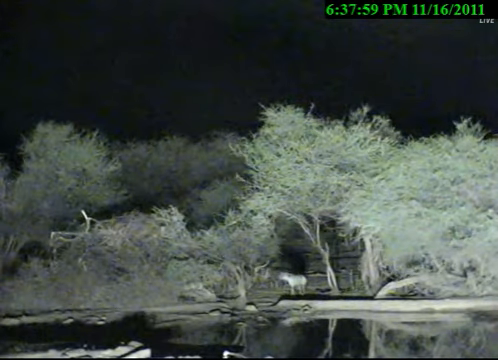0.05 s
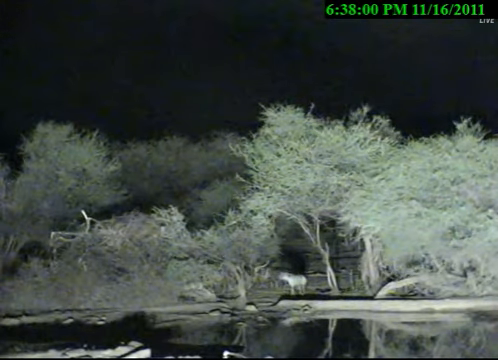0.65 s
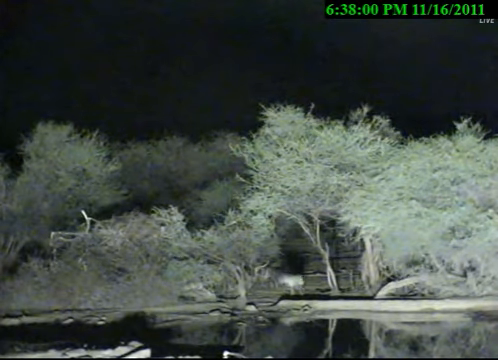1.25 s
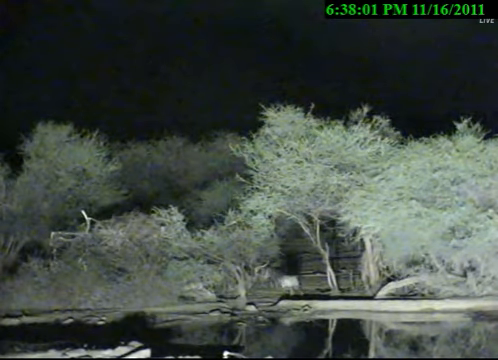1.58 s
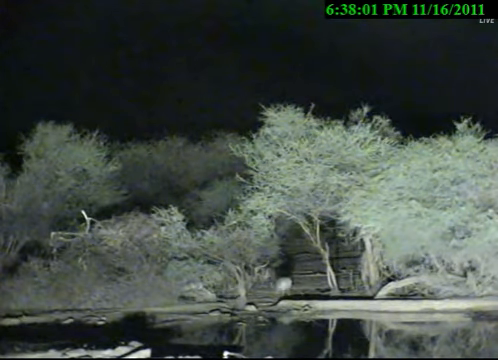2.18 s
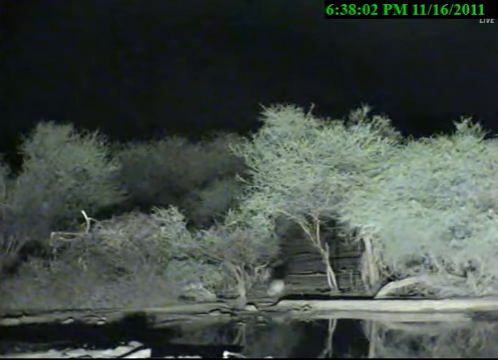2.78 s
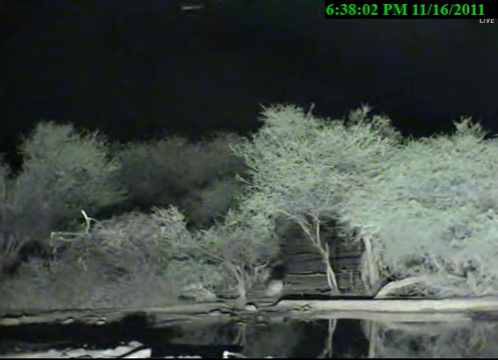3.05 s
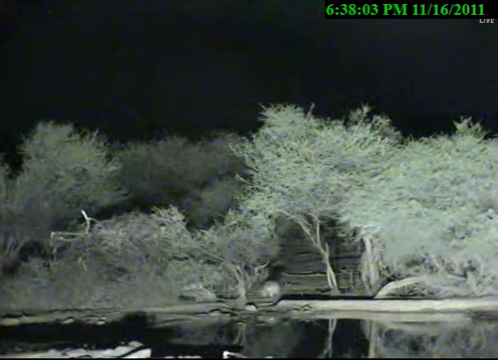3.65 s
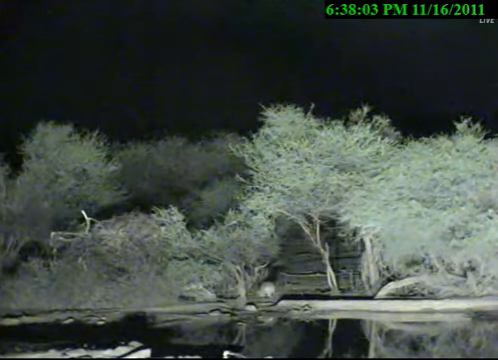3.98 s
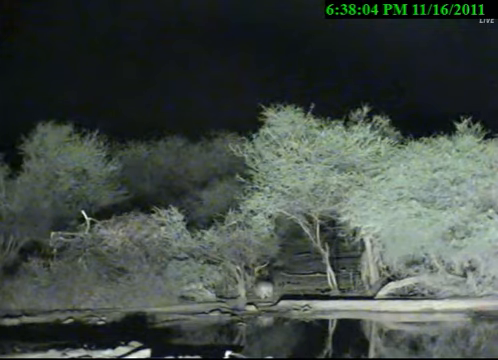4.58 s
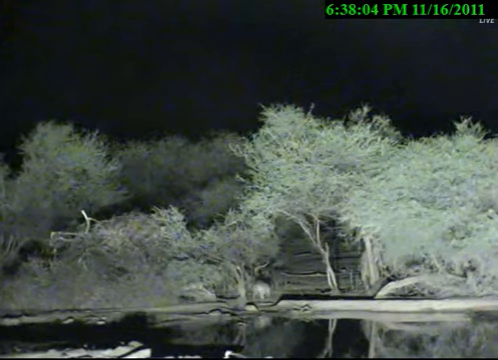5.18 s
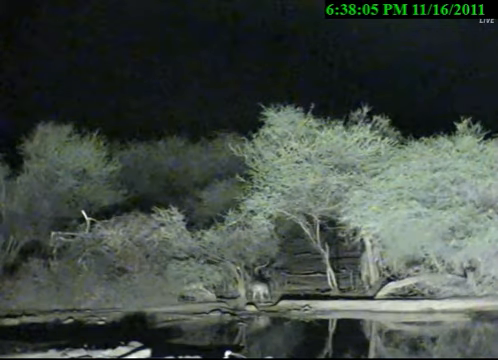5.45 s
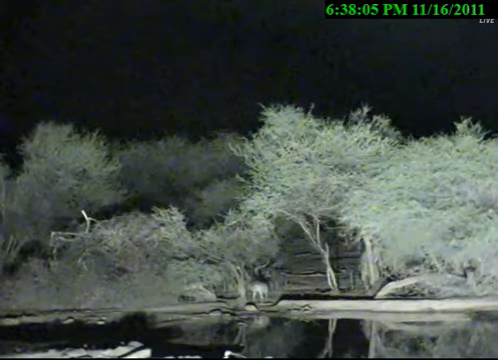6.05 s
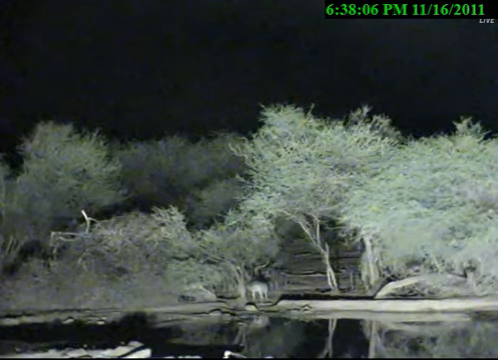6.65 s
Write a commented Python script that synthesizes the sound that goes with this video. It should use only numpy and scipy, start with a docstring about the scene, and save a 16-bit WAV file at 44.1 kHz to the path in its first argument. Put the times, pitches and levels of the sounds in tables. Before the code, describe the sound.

At a waterhole at night, a frog gives short, nasal, raspy croaks about every half second, stopping after five seconds. Small frogs whistle quick runs of high peeps throughout, over a rattling katydid and shrill insect trills. A sharp water plop comes early, and near the end a far animal whoops once, followed by a softer plop. The outdoor microphone also catches a murmuring distant frog chorus and a faint hum.

```python
"""A frog croaks at a waterhole at night: its buzzing larynx drives a resonant vocal sac in short nasal
calls. Small frogs whistle peeps in runs that swell and slow down. By stridulation, a scraper drawn over
a file, a katydid rattles in even phrases and two shriller insects trill in turns. Air pockets plop in
the water and a far animal whoops once. The bush scatters echoes, a far chorus murmurs across the pond,
and the outdoor microphone carries a faint mains hum."""
import sys
import numpy as np
from scipy import signal
from scipy.fft import rfft, irfft, next_fast_len
from scipy.io import wavfile
from scipy.ndimage import uniform_filter1d

SR = 44100
rng = np.random.default_rng(int(sys.argv[2]) if len(sys.argv) > 2 else 0)


def unload_audio(sound):
    """Save the sound as a 16-bit wav file, at the path given as the first command line argument."""
    columns = np.transpose(np.atleast_2d(sound))
    # keep every value between -1 and 1, then stretch to whole-number steps
    steps = np.round(np.clip(columns, -1, 1) * 32767)
    wavfile.write(sys.argv[1], SR, steps.astype(np.int16))


N = 305172
TIME = np.arange(N) / SR

# Levels are relative within each table.
# croaks: onset t/s, duration/s, fundamental f/Hz, tone level/dB, rasp level/dB
CROAKS = [(0.196, 0.12, 231.7, -19, -21.5), (0.847, 0.084, 230, -18.5, -21),
          (2.111, 0.085, 232, -22, -19.5), (2.398, 0.093, 237.6, -33.5, -22.5),
          (2.709, 0.083, 222.6, -28, -23.5), (3.07, 0.11, 224.9, -20.5, -21),
          (3.602, 0.1084, 229.5, -17, -19.5), (4.128, 0.11, 233.2, -19, -20.5),
          (4.559, 0.13, 234.7, -20, -19), (5.074, 0.15, 236.9, -18, -19)]
# partials of a croak, strongest at the resonance of the vocal sac: harmonic number, level/dB
CROAK_HARMONICS = [(2, -18), (3, 0.5), (4, -8.5), (5, -14), (6, -28), (7, -19.5), (8, -18.5), (9, -24),
                   (10, -28)]
# spectrum of the breath in a croak: f/Hz, level/dB
RASP_SPECTRUM = [(150, -51), (300, -31), (450, -6.5), (750, -3.5), (1100, -3.5), (1600, -5), (2100, -11),
                 (2600, -16), (3400, -19), (5000, -13), (8000, -61)]
# single loud peeps and one sharp, insect-like tick: peak t/s, level/dB, f/Hz, duration/s
PEEPS_AND_TICK = [(1.017, -17.5, 4750, 0.015), (1.075, -14.5, 4810, 0.02), (1.136, -11.5, 4790, 0.013),
                  (1.207, -12, 4860, 0.017), (3.438, -18.5, 4740, 0.022), (3.518, -14.5, 4760, 0.032),
                  (3.667, -16, 4780, 0.033), (3.747, -15, 4750, 0.034), (4.099, -19, 5660, 0.009),
                  (4.661, -16, 4780, 0.015), (4.719, -13, 4770, 0.015), (4.781, -12, 4890, 0.019),
                  (4.852, -12, 4905, 0.024)]
# runs of the nearest small frog: start t/s, stretch factor of the gaps
PEEP_RUNS = [(-0.264, 1.0), (0.7075, 0.975), (1.6555, 1.005), (2.69, 1.0), (3.713, 0.985), (4.733, 0.995),
             (5.762, 1.0), (6.756, 0.95)]
# katydid bouts: onset t/s, number of phrases, wing strokes in the last phrase
KATYDID_BOUTS = [(0.084, 3, 10), (0.8, 2, 9), (1.251, 2, 10), (1.718, 1, 10), (1.975, 3, 9), (2.655, 1, 9),
                 (2.893, 4, 9), (3.885, 3, 9), (4.565, 6, 10), (5.95, 5, 9)]
# response of the katydid's wing: f/Hz, level/dB
WING_RESPONSE = [(3500, -28), (4400, -11), (4900, 6.5), (5400, 3.5), (5950, 5.5), (6400, -1), (7200, 11.5),
                 (8000, -12), (8700, -5.5), (10000, -32)]
# bouts of the higher and the lower shrill insect: onset t/s, end t/s, rise time/s, level/dB
HIGH_TRILL_BOUTS = [(-0.5, 0.36, 0.45, -30), (0.55, 1.45, 0.56, -31.5), (1.8, 2.53, 0.4, -30.5),
                    (2.8, 3.55, 0.46, -30.5), (3.88, 4.64, 0.41, -30.5), (5.0, 5.8, 0.47, -31.5),
                    (5.9, 6.67, 0.47, -31)]
LOW_TRILL_BOUTS = [(-0.4, 0.68, 0.3, -34), (0.94, 1.92, 0.24, -31), (1.95, 2.9, 0.25, -37.5),
                   (2.92, 3.53, 0.18, -31.5), (3.83, 4.55, 0.35, -31), (4.6, 5.25, 0.18, -39),
                   (5.1, 6.22, 0.7, -28.5), (6.2, 6.7, 0.09, -46)]
# upper wing mode of the shrill insects: f/Hz, level/dB
UPPER_WING_MODE = [(7600, -33), (8250, -0.5), (8800, 3), (9500, -36.5)]
# plops in the water: onset t/s, level/dB, f/Hz, decay time T60/s
PLOPS = [(1.438, -2, 553, 0.014), (2.893, -17.5, 566, 0.066), (6.47, -20, 782, 0.1)]
# contour of the whoop: t/s, f/Hz, level/dB
WHOOP_CONTOUR = [(6.168, 480, -44), (6.21, 529.5, -30.5), (6.25, 598, -27), (6.28, 789, -27),
                 (6.331, 702, -30.5), (6.37, 560, -41)]
# spectrum of the whoop's hoarseness: f/Hz, level/dB
WHOOP_RASP_SPECTRUM = [(250, -25), (700, 7.5), (1400, -14), (2400, -1), (3400, -8), (5000, -34)]
# spectra of the far frogs and the far insects: f/Hz, level/dB
CHORUS_SPECTRUM = [(30, -74.5), (100, -57), (150, -33.5), (220, -21.5), (320, -7.5), (450, -0.5),
                   (680, 3.5), (950, -3.5), (1200, -12.5), (2000, -14.5), (3000, -15.5), (4000, -17.5),
                   (7000, -16.5), (10000, -41.5)]
FAR_INSECT_SPECTRUM = [(3500, -27), (4100, -18.5), (4500, -7.5), (5200, -2), (6000, 0), (6700, 3.5),
                       (7400, -24), (8000, -34.5), (8800, -24), (10000, -38)]
# reverberation of the bush round the pond: f/Hz, decay time T60/s
BUSH_DECAY = [(300, 0.11), (800, 0.29), (2500, 0.16), (5000, 0.13), (9000, 0.013)]
# mains hum and a faint electrical whine: f/Hz, level/dB
HUM_PARTIALS = [(150, -77), (193, -66), (250, -57.5), (300, -57), (350, -52.5), (955, -45)]


def croak(start, length, hz, tone_db, rasp_db, attack_s=0.041, droop=0.082, jitter=0.017, dulling_db=17):
    """Source and filter: the larynx rings the vocal sac; pitch sags and tone dulls as air runs out."""
    u = np.linspace(0, 1, int(length * SR))
    push = np.interp(u, [0, np.clip(attack_s / length, .1, .9), 1], [0, 1, 0])
    arch = 1 + droop * (.2 - 3 * (u - .24) ** 2)
    cycles = np.cumsum(hz * arch * (1 + jitter * wander(len(u), 300))) / SR
    tone = sum(gain_of(db - dulling_db * (u - .45) * (k - 3) / 5)
               * np.cos(2 * np.pi * (k * cycles + rng.random())) for k, db in CROAK_HARMONICS)
    tone = unit_rms(tone * (1 + .2 * wander(len(u), 150)))
    # air breaks through in a puff each cycle, brightest early and under the hardest push
    airflow = 1 + np.exp(-(cycles % 1) / 0.21)
    puffs = colour(airflow * rng.standard_normal(len(u)), RASP_SPECTRUM)
    dull_puffs = signal.lfilter(*signal.butter(1, 700, fs=SR), puffs)
    brightness = push ** 0.28 * (1 - u) ** 1.5
    rasp = unit_rms(puffs * brightness + 1.47 * dull_puffs * (1 - brightness))
    envelope = unit_rms(np.sin(np.pi / 2 * push) ** 1.2)
    return start, envelope * (gain_of(tone_db + 0.5) * tone + gain_of(rasp_db - 5.5) * rasp)


def peep(peak_s, db, hz, length, symmetric_s=.028, quaver_hz=45, octave_db=-30):
    """Frequency glide: a whistle with a faint octave slides down; shorter notes start more abruptly."""
    u = np.linspace(0, 1, int(length * SR))
    skew = (length / symmetric_s) ** .45
    crest = .5 ** (1 / skew)  # fraction of the note at which the envelope peaks
    fall = 0.021 + 5.26 * length
    slide = fall * (u - crest + 1.6 * (u - crest) ** 2 * length / symmetric_s)
    phase = 2 * np.pi * np.cumsum(hz * (1 - slide) + quaver_hz * wander(len(u), 493)) / SR
    envelope = np.sin(np.pi * u ** skew) * (1 + .13 * wander(len(u), 700))
    whistle = np.sin(phase) + gain_of(octave_db) * np.sin(2 * phase)
    return peak_s - length * crest, gain_of(db + 3.5) * envelope * whistle


def peep_run(start, stretch, count=9, warm_db=-19.5, warm_hz=4924, peep_s=.0145):
    """Approach to a steady state: as the frog warms up, its peeps come slower, louder and higher."""
    k = np.arange(count)
    gaps = .0495 - .018 * np.exp(-(k / 3.15) ** 2)
    cold = np.exp(-k / 1.8)
    level_scatter, pitch_scatter, length_scatter = rng.standard_normal((count, 3)).T
    times = start + stretch * (np.cumsum(gaps) - gaps)
    levels = warm_db - 12 * cold + 1.3 * level_scatter
    pitches = warm_hz - 190 * cold + 40 * pitch_scatter
    return zip(times, levels, pitches, peep_s * np.exp(.12 * length_scatter))


def katydid(db=-31.5, uneven_db=1.9, tooth_s=.001603, ring_hz=5600, glide_hz=1300, ring_s=0.003006):
    """Impulse excitation: each stroke plucks five teeth, and each gives a falling ring of the wing."""
    clicks = np.zeros(N)
    teeth = np.array([0.82, -0.59, 1.0, 0.22, 0.66])
    for start in stroke_times():
        force = teeth * gain_of(uneven_db * rng.standard_normal())
        force *= 1 + 0.051 * rng.standard_normal(len(teeth))
        spacing = tooth_s * rng.normal(1, .008)
        stroke = np.zeros(512)
        stroke[np.round(np.arange(len(teeth)) * spacing * SR).astype(int)] = force
        add(clicks, start + rng.normal(0, .0003), stroke)
    u = np.linspace(-1, 1, int(ring_s * SR))
    ring = np.hanning(len(u)) ** .5 * np.sin(2 * np.pi * np.cumsum(ring_hz - glide_hz * u) / SR)
    return gain_of(db) * colour(np.convolve(clicks, ring, "same"), WING_RESPONSE)


def stroke_times(phrase_s=.2294, stroke_s=.0183, phrase_strokes=9):
    """Periodicity on two scales: the katydid's even wing strokes fall in evenly spaced phrases."""
    return [start + phrase * phrase_s + stroke * stroke_s
            for start, phrases, last in KATYDID_BOUTS for phrase in range(phrases)
            for stroke in range(last if phrase == phrases - 1 else phrase_strokes)]


def trill(bouts, strokes_hz, top_hz, bottom_hz, rough_rad, gain_db, upper_db):
    """Stridulation: a scraper slows along its file, so each stroke falls; an upper mode rings too."""
    strokes = np.cumsum(strokes_hz * (1 + .025 * wander(N, 30))) / SR
    u = strokes % 1
    hz = top_hz + (bottom_hz - top_hz) * u + 90 * wander(N, 80)
    whistle = np.sin(2 * np.pi * np.cumsum(hz) / SR + rough_rad * wander(N, 2000))
    upper_mode = gain_of(upper_db) * colour(rng.standard_normal(N), UPPER_WING_MODE)
    pulses = np.sin(np.pi * u) ** 6
    pulses *= (1 + 0.21 * np.cos(np.pi * strokes)) * gain_of(2.1 * wander(N, 70))
    return gain_of(gain_db) * trill_envelope(bouts) * unit_rms(pulses * (whistle + upper_mode))


def trill_envelope(bouts, rise_db=26, stop_s=0.022):
    """Exponential growth: each bout swells from a whisper, holds, and breaks off."""
    envelopes = [gain_of(db - rise_db * np.maximum(1 - (TIME - start) / rise_s, 0))
                 * np.clip((end - TIME) / stop_s + .5, 0, 1) for start, end, rise_s, db in bouts]
    return np.max(envelopes, axis=0)


def plop(start, db, hz, t60, sharp=0.56):
    """Damped oscillation: a pocket of air rings briefly in the water, starting above its final pitch."""
    t = np.arange(SR // 5) / SR
    cycles = hz * (t + sharp * 0.0016 * (1 - np.exp(-t / 0.0025)))
    attack = 1 - np.exp(-(t / 0.0017) ** 2)
    return start, gain_of(db - 60 * t / t60) * attack * np.sin(2 * np.pi * cycles)


def whoop(jitter=0.062, rasp_db=-10.5):
    """Frequency modulation: a far call glides up and falls back, hoarse with jitter and noise."""
    times, hz, db = np.transpose(WHOOP_CONTOUR)
    t = np.arange(times[0], times[-1], 1 / SR)
    phase = 2 * np.pi * np.cumsum(np.interp(t, times, hz) * (1 + jitter * wander(len(t), 302))) / SR
    rasp = gain_of(rasp_db) * colour(rng.standard_normal(len(t)), WHOOP_RASP_SPECTRUM)
    return times[0], gain_of(np.interp(t, times, db)) * (np.sqrt(2) * np.sin(phase) + rasp)


def far_peeps(per_s=36, db=-42.0, hz=4550):
    """Reverberant blurring: frogs on the far bank peep lower and out of step, half lost in echoes."""
    direct = np.zeros(N)
    for slot, (delay, level, pitch) in enumerate(rng.uniform(-1.4, 1, (int(per_s * N / SR), 3))):
        add(direct, *peep((slot + .5 * delay) / per_s, db + 3 * level, hz + 200 * pitch, length=.016))
    return direct + 0.61 * bush_echoes(direct)


def far_chorus(db=-31.0, patchy_db=2, swell_db=0.3):
    """Incoherent summation: many distant frogs blur into a murmur whose bands come and go."""
    hz, _, bands = signal.stft(rng.standard_normal(N), SR, nperseg=1024, noverlap=768)
    patches = uniform_filter1d(rng.standard_normal(bands.shape), size=5, axis=0)
    patches = unit_rms(uniform_filter1d(patches, size=10, axis=1))
    bands *= gain_of(patchy_db * patches / (1 + (hz[:, None] / 1500) ** 2))
    murmur = signal.istft(bands, nperseg=1024, noverlap=768)[1][:N]
    return gain_of(db - swell_db * wander(N, 4)) * colour(murmur, CHORUS_SPECTRUM)


def far_insects(db=-39.5):
    """Incoherent summation: distant insects merge into a high, slightly flickering hiss."""
    return gain_of(db) * colour(rng.standard_normal(N), FAR_INSECT_SPECTRUM) * gain_of(wander(N, 100))


def bush_echoes(x, returns_per_s=2500):
    """Scattering: trees and bank send back a dense tail of echoes, the treble dying first."""
    size = SR // 2
    returns = rng.standard_normal(size) * (rng.random(size) < returns_per_s / SR)
    returns *= np.arange(size) > 120  # short gap before the first echo
    hz, t, bands = signal.stft(returns, SR, nperseg=256)
    decay = gain_of(-60 * t / curve_at(BUSH_DECAY, hz)[:, None])
    tail = signal.istft(bands * decay, SR, nperseg=256)[1]
    return signal.fftconvolve(x, tail / np.linalg.norm(tail))[:N]


def mains_hum():
    """Line spectrum: steady sinusoids make the mains hum and a faint electrical whine."""
    return sum(gain_of(db) * np.sqrt(2) * np.sin(2 * np.pi * (hz * TIME + rng.random()))
               for hz, db in HUM_PARTIALS)


def gain_of(db):
    """Amplitude ratio of a level in decibels."""
    return 10 ** (np.asarray(db) / 20)


def unit_rms(x):
    """Normalisation to rms 1."""
    return x / np.sqrt(np.mean(x ** 2) + 1e-20)


def curve_at(points, hz):
    """Linear interpolation on a log-frequency axis."""
    f, value = np.transpose(points)
    return np.interp(np.log(hz + 1), np.log(f), value)


def colour(x, spectrum):
    """Spectral shaping: filters x by a spectrum and scales it to rms 1."""
    size = next_fast_len(len(x) + 512)
    response = gain_of(curve_at(spectrum, np.fft.rfftfreq(size, 1 / SR)))
    return unit_rms(irfft(rfft(x, size) * response, size)[:len(x)])


def wander(size, per_s):
    """Random modulation: a line through per_s unit Gaussian values a second."""
    at = np.arange(size) * per_s / SR
    return np.interp(at, np.arange(4096), rng.standard_normal(4096))


def add(mix, start, sound):
    """Superposition of a sound on the mix from start seconds on."""
    at = round(start * SR)
    part = mix[max(at, 0):][:max(len(sound) + min(at, 0), 0)]
    part += sound[max(-at, 0):][:len(part)]


def scene():
    """Superposition of the callers round the pond, their echoes and the far night behind them."""
    low_calls, peeps = np.zeros(N), far_peeps()
    for row in CROAKS:
        add(low_calls, *croak(*row))
    for row in PLOPS:
        add(low_calls, *plop(*row))
    add(low_calls, *whoop())
    for row in PEEPS_AND_TICK:
        add(peeps, *peep(*row))
    for run in PEEP_RUNS:
        for note in peep_run(*run):
            add(peeps, *peep(*note))
    insects = katydid()
    insects += trill(HIGH_TRILL_BOUTS, strokes_hz=69.4, top_hz=8220, bottom_hz=6000,
                     rough_rad=0.23, gain_db=-7.5, upper_db=-20.5)
    insects += trill(LOW_TRILL_BOUTS, strokes_hz=55.3, top_hz=7300, bottom_hz=5860,
                     rough_rad=0.64, gain_db=-8.5, upper_db=-28)
    echoes = bush_echoes(gain_of(-14.5) * low_calls + gain_of(-11.5) * peeps + gain_of(-15.5) * insects)
    background = far_insects() + mains_hum() + far_chorus()
    return (low_calls + peeps + insects + echoes + background)[None]


def record(dry, low_hz=130, high_hz=10300):
    """Band limiting: the microphone drops the deep bass, and a steep low-pass cuts the top treble."""
    thin = signal.sosfilt(signal.butter(4, low_hz, "high", fs=SR, output="sos"), dry)
    low_pass = signal.firwin(511, high_hz, window=("kaiser", 9), fs=SR)
    return signal.oaconvolve(thin, low_pass[None], "same")


dry = scene()
out = record(dry)
unload_audio(out)
```